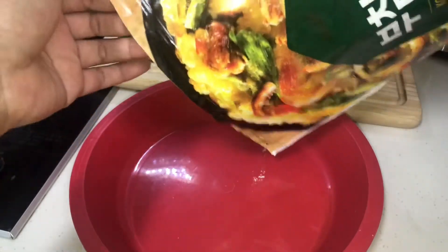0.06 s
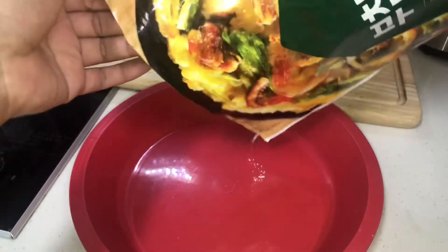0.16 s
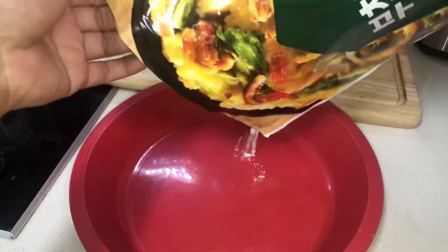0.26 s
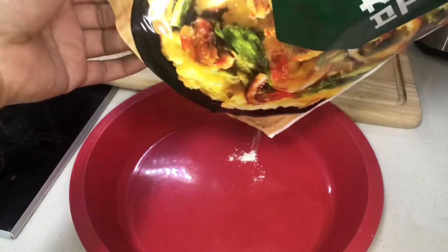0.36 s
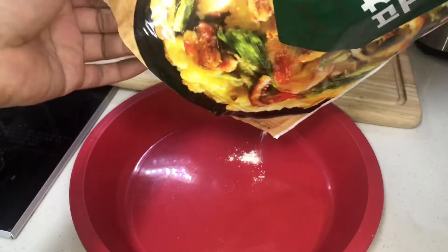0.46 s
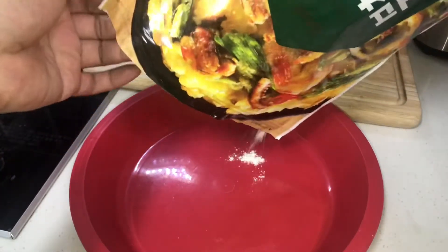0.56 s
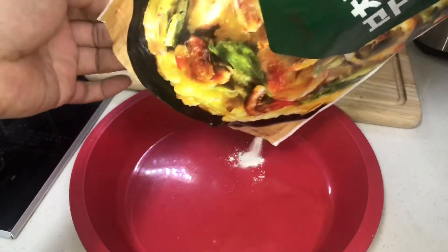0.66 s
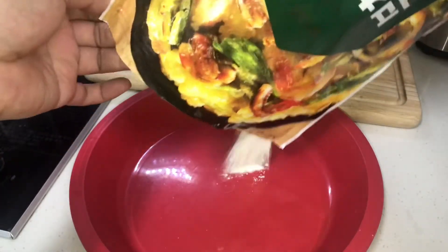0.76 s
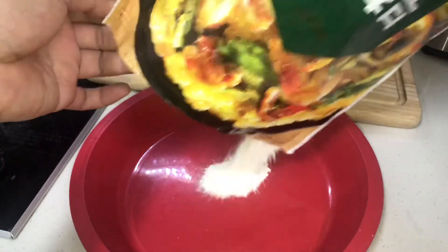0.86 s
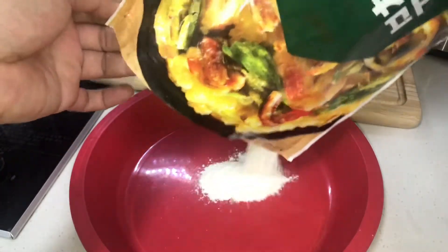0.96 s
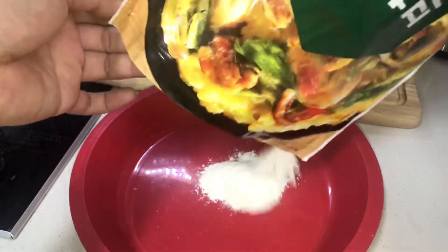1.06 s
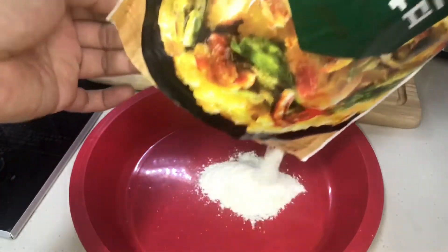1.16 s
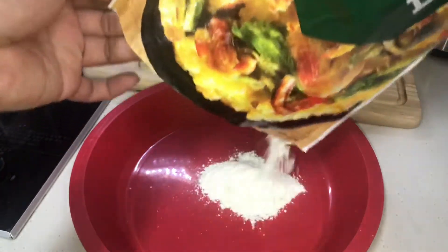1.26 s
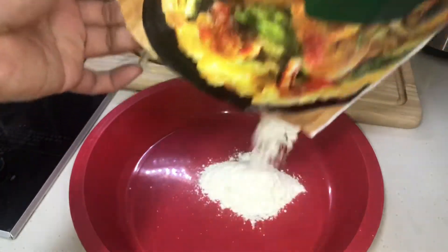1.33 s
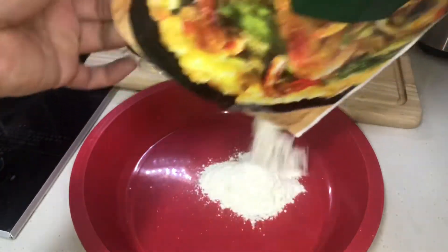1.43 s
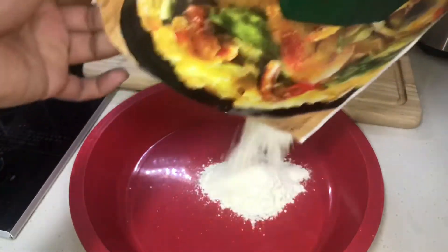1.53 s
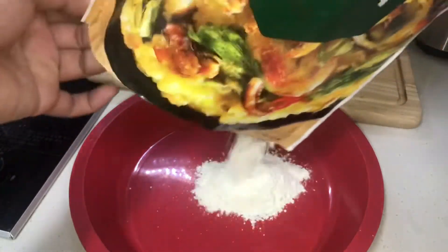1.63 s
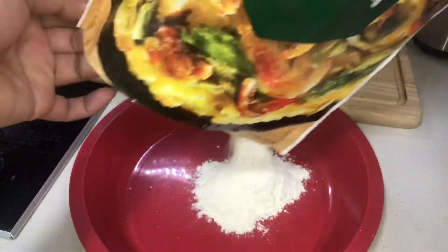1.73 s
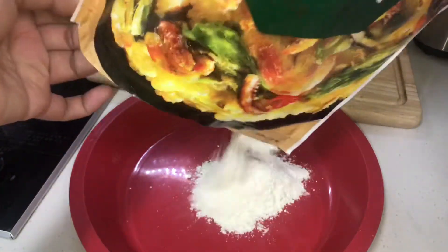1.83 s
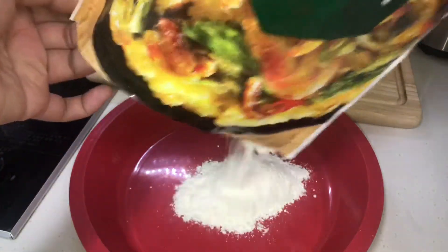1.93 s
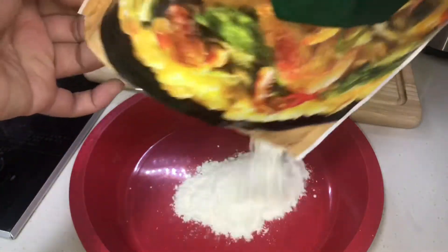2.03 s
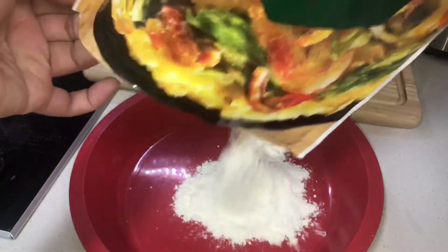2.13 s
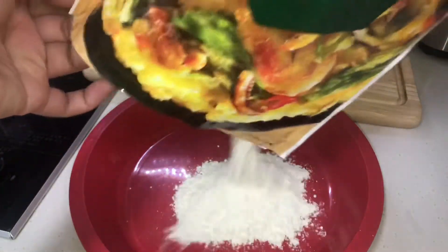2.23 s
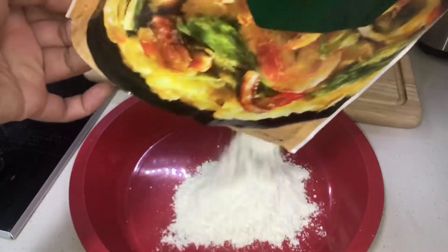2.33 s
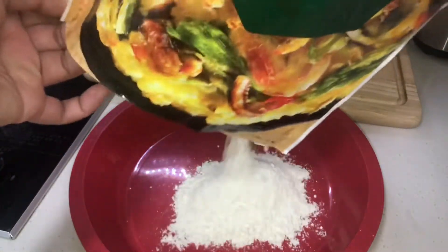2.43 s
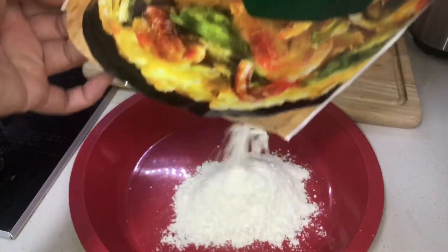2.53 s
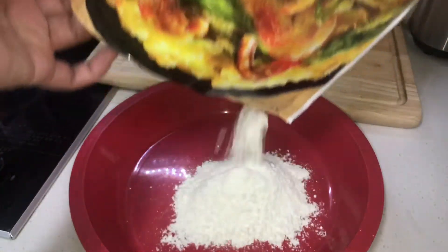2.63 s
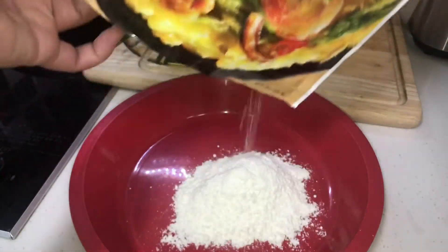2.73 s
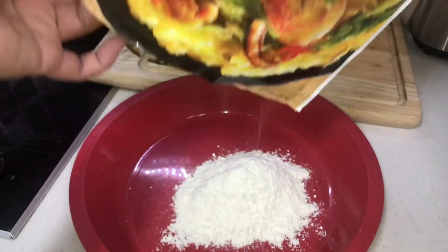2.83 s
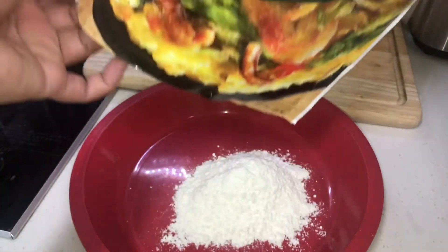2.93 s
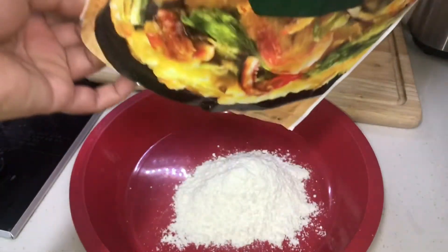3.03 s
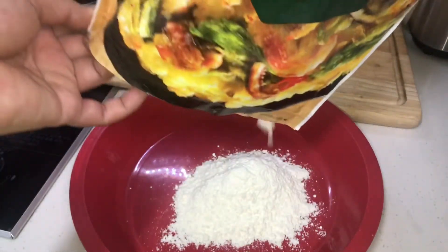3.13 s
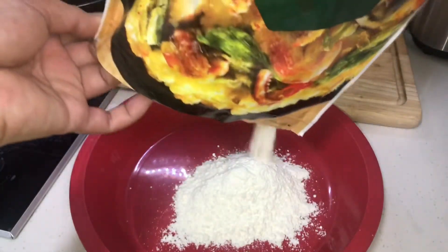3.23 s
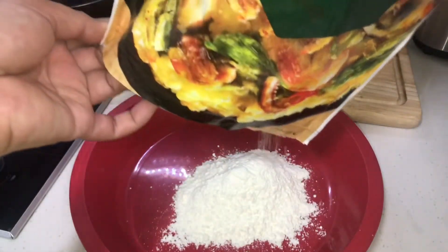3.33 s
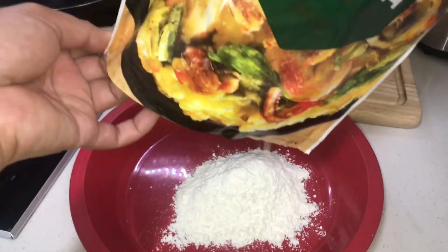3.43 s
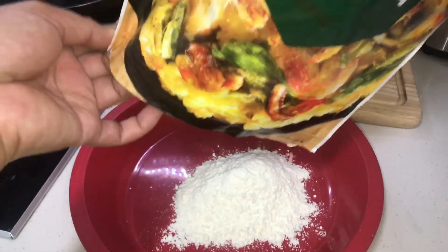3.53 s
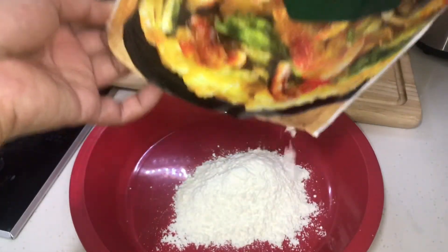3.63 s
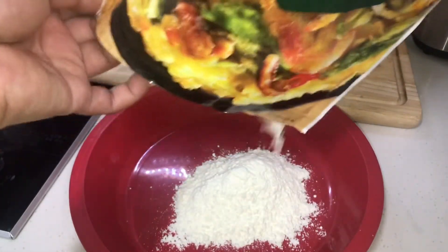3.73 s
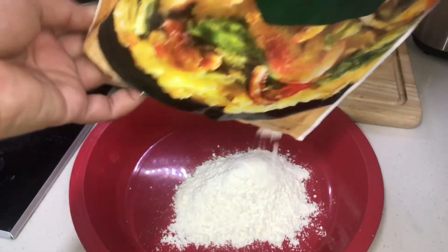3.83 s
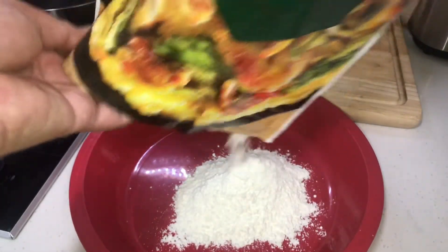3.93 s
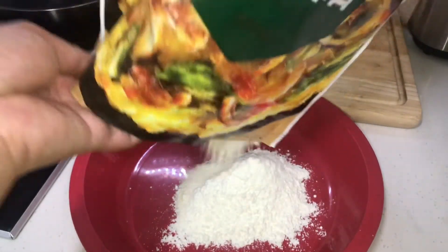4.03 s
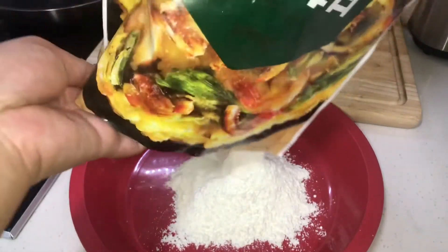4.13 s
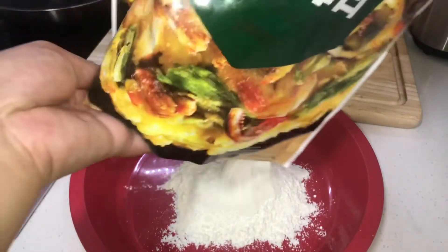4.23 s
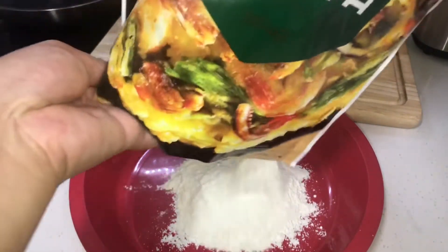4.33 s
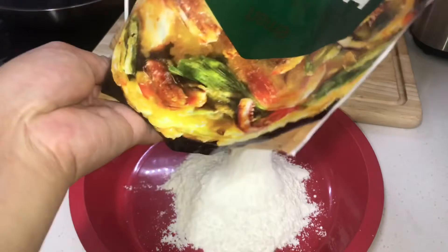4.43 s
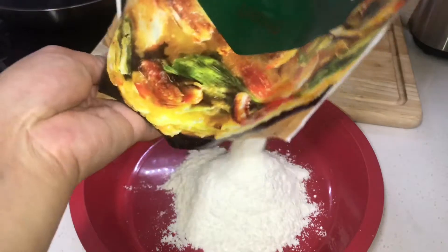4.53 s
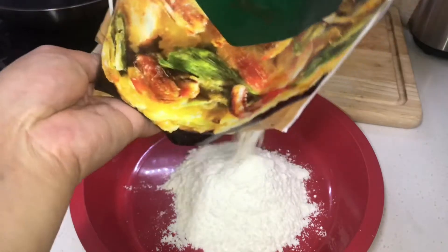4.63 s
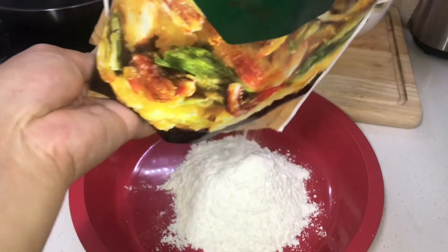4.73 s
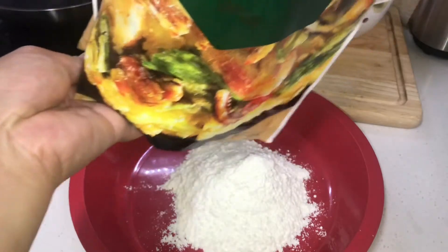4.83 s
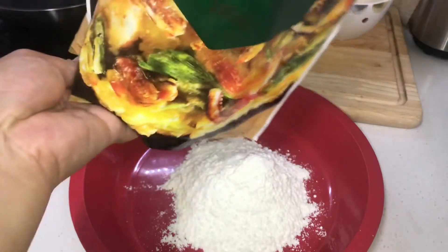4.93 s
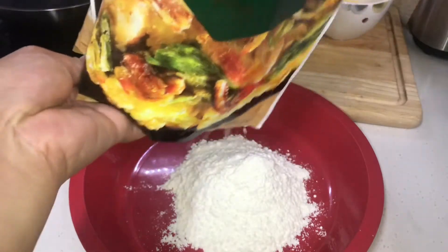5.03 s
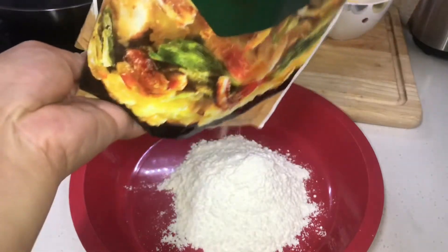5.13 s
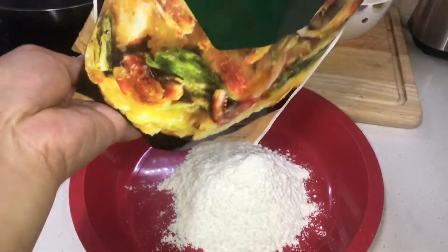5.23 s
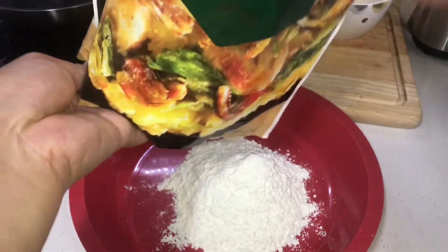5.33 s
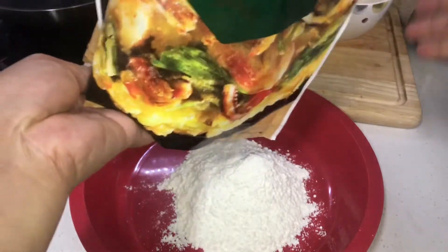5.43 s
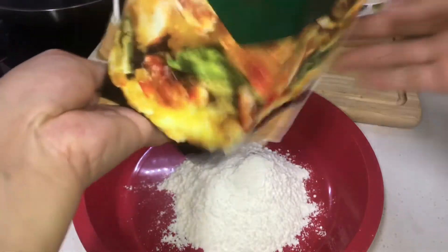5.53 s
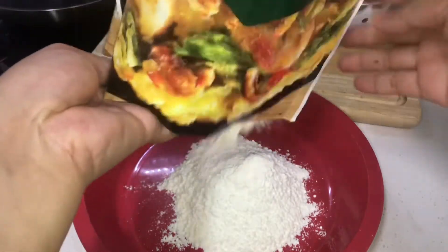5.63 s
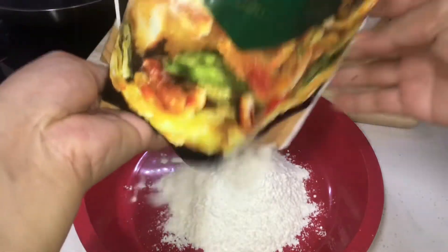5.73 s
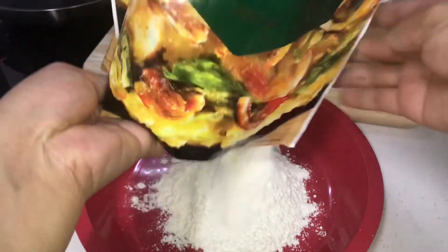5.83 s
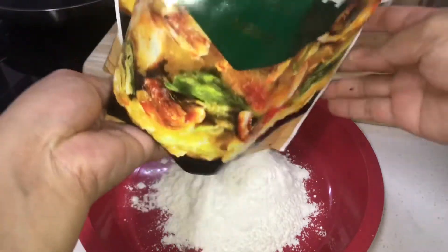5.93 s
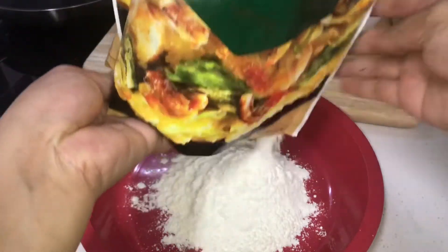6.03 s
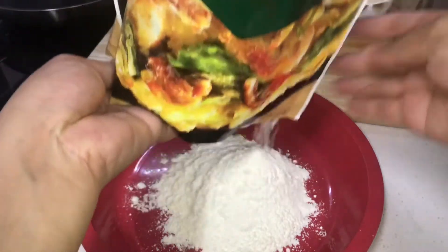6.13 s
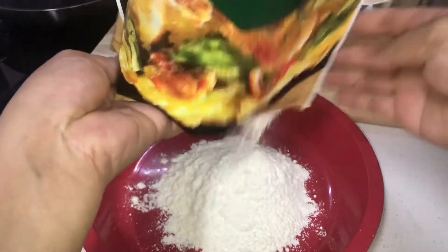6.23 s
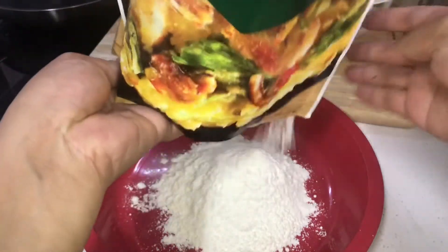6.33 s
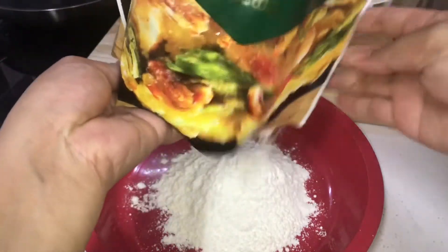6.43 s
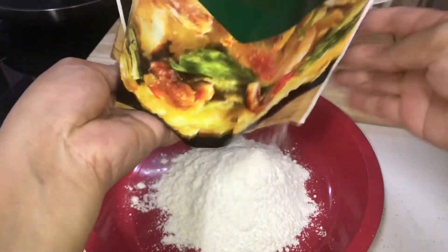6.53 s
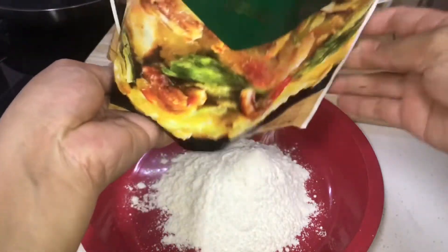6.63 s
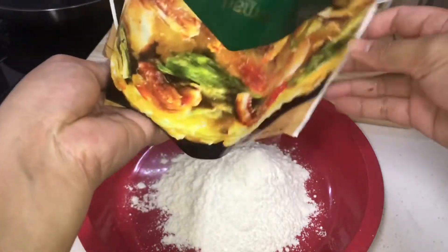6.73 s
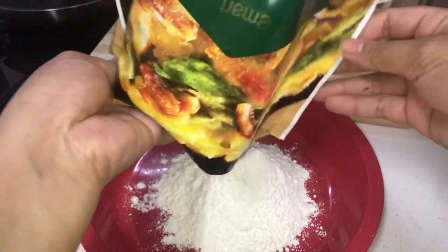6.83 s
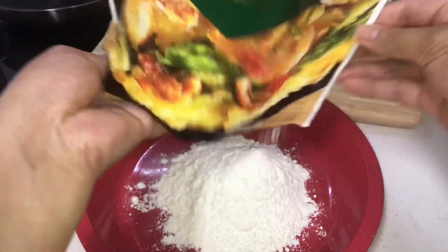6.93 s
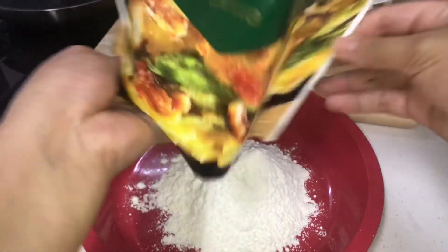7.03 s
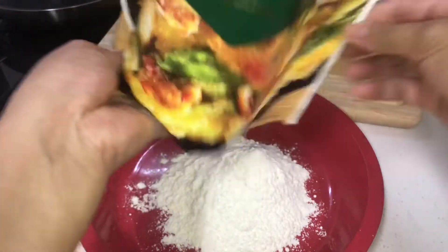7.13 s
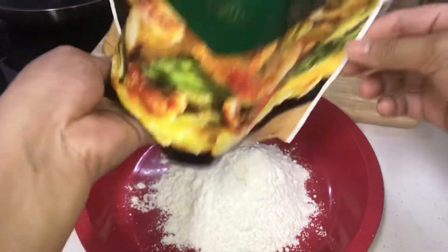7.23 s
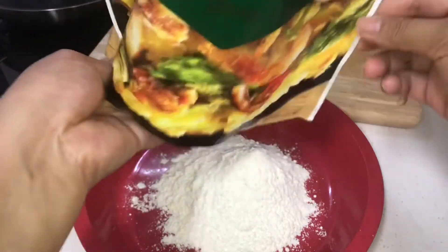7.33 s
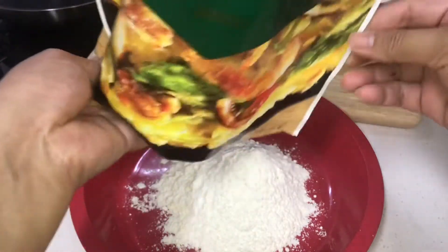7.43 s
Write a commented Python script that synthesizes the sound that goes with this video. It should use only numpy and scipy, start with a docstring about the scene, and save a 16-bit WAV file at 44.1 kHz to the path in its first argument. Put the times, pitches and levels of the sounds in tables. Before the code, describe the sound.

Soft rhythmic swishes of powder, about six per second, come from a tilted foil packet, with scattered clicks and low pats. After a lull near three seconds, sharp foil snaps and hissing slumps return. Later the packet is thumped harder and deeper, crumpling into a thick flurry of crackles. Near microphone, small hard room, plastic bowl underneath, quiet room noise and wavering mains hum.

```python
"""In a small kitchen a stiff foil packet of pancake mix is shaken and patted over a plastic bowl.
Creases of the foil snap as damped resonances, and many small ones crinkle while the foil is flexed.
Powder hisses as noise whose power follows its flow along the film; hands thump as low, damped noise bursts.
Modes of the bowl and echoes of the room follow, over quiet noise and two electric hums that beat slowly."""
import sys
import numpy as np
from scipy import signal
from scipy.fft import rfft, irfft
from scipy.io import wavfile
from scipy.ndimage import uniform_filter1d, map_coordinates

SR = 44100
rng = np.random.default_rng(int(sys.argv[2]) if len(sys.argv) > 2 else 0)


def transcribe(signal):
    """Save signal, clipped to [-1, 1], as a 16-bit WAV file at the path in sys.argv[1]."""
    frames = np.atleast_2d(signal).T
    limited = np.clip(frames, -1, 1)
    pcm = np.round(limited * 32767).astype(np.int16)
    wavfile.write(sys.argv[1], SR, pcm)


N = 329868
TIME = np.arange(N) / SR  # seconds

# Spectrum of the room noise. Each row: frequency in Hz, relative density in dB.
AIR_SPECTRUM = [(25, -12), (50, -6), (66, -5), (87, -25), (140, -19.5), (285, -17), (394, -23), (887, -23),
                (1560, -24.5), (5000, -38.5), (14800, -46)]
# Overtones of the mains hum. Each row: multiple of the mains frequency, rms level in dB.
HUM_OVERTONES = [(2, -71.5), (5, -73)]
# Modes of the bowl. Each row: frequency in Hz, level in dB, decay time t60 in seconds.
BOWL_MODES = [(386.5, -28, 0.071), (614, -26.5, 0.06), (1100, -30, 0.04), (2676, -35, 0.066)]
# Spectrum of the powder hiss. Each row: frequency in Hz, relative density in dB.
POWDER_SPECTRUM = [(150, -14), (400, 5.5), (1200, 6), (2500, 3.5), (4500, 1.5), (7000, 1.5), (10000, -0.5),
                   (13000, 0), (16000, -1.5)]
# Steady trickles from the tilted packet. Each row: start in seconds, end in seconds, relative level in dB.
POURS = [(0, 1.18, -60.5), (1.293, 2.46, -66.5), (2.845, 2.946, -65), (3.831, 4.45, -57.5),
         (5.555, 5.93, -59.5)]
# Single slides of powder along the film. Each row: middle in seconds, relative level in dB, length in seconds.
SLIDES = [(0.132, -53, 0.1), (4.567, -53, 0.12), (4.671, -56, 0.05), (5.289, -53, 0.015),
          (5.784, -50.5, 0.1), (6.009, -49.5, 0.014), (6.24, -50, 0.016), (6.74, -46.5, 0.035),
          (6.776, -43.5, 0.0036), (7.334, -41.5, 0.005)]
# Powder slides of the even shakes, in order. Each entry: relative level in dB.
SHAKE_SLIDE_DB = [-52.5, -52.5, -54, -60, -58.5, -55, -54.5, -55, -55, -54.5, -56.5]
# Powder slumping at once after a jolt. Each row: start in seconds, relative level in dB, t60 in seconds.
SLUMPS = [(3.447, -42.5, 0.4), (3.893, -34, 0.2), (5.001, -46.5, 0.24), (5.095, -44, 0.12),
          (5.267, -48, 0.092), (5.52, -36, 0.066), (6.155, -54.5, 1), (6.575, -35.5, 0.064),
          (7.343, -35, 0.035)]
# Pushes or pats of the hand on the filled packet.
# Each row: start in seconds, thud level in dB, thud pitch in Hz, relative crinkling level in dB.
PATS = [(0.145, -44.5, 332, -58), (0.244, -50, 330, -57), (1.383, -36, 164, -52.5),
        (1.628, -44.5, 270, -70), (2.123, -33.5, 230, -54), (3.454, -45.5, 269, -72),
        (4.027, -32, 258, -50), (4.269, -33.5, 157, -60), (5.002, -39.5, 184, -57),
        (5.093, -43.5, 186, -55.5), (5.521, -36, 135, -34), (5.725, -38.5, 149, -43.5),
        (5.924, -53, 185, -49.5), (6.151, -30.5, 119, -41.5), (6.37, -30, 88, -43),
        (6.543, -32.5, 88.5, -50.5), (6.58, -34, 195, -51), (6.768, -41, 91.5, -48), (7.073, -37, 125, -63)]
# Squeezes: a tighter grip keeps the foil crinkling.
# Each row: start in seconds, end in seconds, relative crinkling level in dB.
SQUEEZES = [(2.012, 2.226, -55), (3.908, 4.405, -63), (6.797, 7.17, -49)]
# Radiation of the foil. Each row: frequency in Hz, relative gain in dB.
FOIL_SPECTRUM = [(200, -2.5), (390, -5), (700, -4), (1010, -1), (1400, 1.5), (2000, -3.5), (2710, -2),
                 (3800, -4), (6300, -5), (8600, -10.5)]
# Large creases snapping.
# Each row: start in seconds, level in dB, pitch of the flipping facet in Hz, ring of the panel around it in Hz.
SNAPS = [(0.1736, -43, 2900, 1180), (0.3933, -34, 1750, 1080), (0.647, -36.5, 1500, 1150),
         (0.687, -33.5, 1330, 1100), (0.7956, -16.5, 6050, 2470), (0.931, -48, 950, 500),
         (0.9592, -41.5, 1370, 1220), (1.1488, -45.5, 1300, 1000), (1.2912, -45, 1250, 1040),
         (1.3415, -34.5, 1580, 880), (1.391, -38.5, 2320, 1190), (1.546, -44, 1400, 1330),
         (1.644, -43, 1300, 1590), (1.7251, -34.5, 3330, 1520), (1.729, -38, 3340, 630),
         (2.024, -49, 1600, 1500), (2.043, -48.5, 1700, 1280), (2.107, -45, 1000, 1000),
         (2.124, -29, 2280, 1100), (2.183, -42, 1500, 1350), (2.218, -49, 1400, 960),
         (2.2788, -45.5, 1100, 1040), (3.5774, -38, 2180, 2290), (3.8958, -18.5, 10000, 2690),
         (4.0304, -30.5, 3200, 1030), (4.105, -30.5, 2700, 1020), (4.134, -43, 1300, 1100),
         (4.2696, -19.5, 5270, 1570), (4.367, -32.5, 1660, 560), (4.5185, -45.5, 1420, 1310),
         (5.003, -38, 5800, 1290), (5.096, -37, 3230, 1270), (5.473, -41, 990, 1230),
         (5.5243, -38, 2330, 1350), (5.5347, -29.5, 1650, 1400), (5.548, -32, 1600, 3020),
         (5.56, -32, 2360, 970), (5.573, -37, 800, 616), (5.581, -27, 1650, 2550), (5.589, -36, 1300, 536),
         (5.609, -39, 1700, 1100), (5.624, -36, 1350, 1190), (5.75, -38.5, 1190, 960),
         (5.8032, -41.5, 2380, 1830), (6.1665, -25, 4100, 2860), (6.244, -40, 2240, 1200),
         (6.3814, -40, 1350, 2020), (6.4045, -32.5, 1420, 1310), (6.4515, -41, 1500, 634),
         (6.476, -43, 1300, 1580), (6.54, -46, 3400, 2980), (6.551, -42, 1200, 1300),
         (6.578, -33.5, 1700, 680), (6.8087, -29.5, 5500, 985), (6.8244, -34, 2960, 1020),
         (6.8527, -27.5, 2700, 1530), (6.9264, -32, 2280, 3060), (6.943, -40, 1800, 1000),
         (6.9596, -28.5, 1910, 1320), (7.0093, -35, 1400, 970), (7.0171, -31, 3600, 1400),
         (7.0541, -30, 2680, 3070), (7.061, -34, 1500, 940), (7.068, -25, 2070, 815),
         (7.08, -22.5, 3460, 1360), (7.109, -40.5, 1300, 594), (7.1473, -28, 1730, 1190),
         (7.154, -40.5, 1900, 1120), (7.165, -43, 1900, 790), (7.1754, -33.5, 2230, 790),
         (7.187, -36.5, 1750, 1560), (7.344, -39.5, 8800, 3200)]

# Two hums: the motor lags the mains by SLIP_HZ, and they add up fully at IN_STEP_S (rms levels).
MAINS_HZ, MAINS_DB = 59.99, -56.5
MOTOR_DB, SLIP_HZ, IN_STEP_S = -51, 0.512, 1.8
# Even shakes: each slides the powder and, as it turns back, flexes the foil.
FIRST_SHAKE_S, SHAKE_PERIOD_S, SHAKE_SLIDE_S = 0.69, 0.1567, 0.09
SHAKE_FLEX_DB, SHAKE_FLEX_LEAD_S = -68, 0.078
# After a pat the foil flexes first, then powder spills over the lip (level relative to the thud).
FLEX_PEAK_S, SPILL_PEAK_S, SPILL_DB = 0.023, 0.037, -31
POUR_ATTACK_S, POUR_T60 = 0.0013, 0.82
SQUEEZE_ATTACK_S, SQUEEZE_T60 = 0.0063, 0.42
CRINKLES_PER_S = 190
TOP_HZ = 16100


def undb(db):
    """Logarithmic level: decibels to amplitude gain."""
    return 10 ** (np.asarray(db) / 20)


def unit(x):
    """Normalization: scale a signal to energy 1."""
    return x / np.sqrt(np.sum(x ** 2))


def fade(t, t60):
    """Exponential decay, by 60 dB in t60 seconds."""
    return np.exp(-np.log(1000) * t / t60)


def freqs(n):
    """Discrete spectrum: frequencies of its n-point bins in Hz, kept above zero."""
    return np.maximum(np.arange(n // 2 + 1) * SR / n, 1)


def colour(points, hz):
    """Spectral envelope: gain interpolated in dB over log frequency."""
    f, db = np.transpose(points)
    return undb(np.interp(np.log(hz), np.log(f), db))


def shape(x, gain):
    """Minimum-phase filtering: the folded cepstrum gives a causal filter of the given gain."""
    n = len(x)
    cepstrum = irfft(np.log(gain), n)
    cepstrum[1:n // 2] *= 2
    cepstrum[n // 2 + 1:] = 0
    return irfft(rfft(x) * np.exp(rfft(cepstrum)), n)


def tint(x, points):
    """Spectral weighting of a full-length signal, normalized to rms 1."""
    return unit(irfft(rfft(x) * colour(points, freqs(N)), N)) * np.sqrt(N)


def walk(rate):
    """Slow random fluctuation: normal values, `rate` per second, joined by straight lines."""
    knots = rng.standard_normal(int(N / SR * rate) + 2)
    return np.interp(TIME * rate, np.arange(len(knots)), knots)


def burst(t, t60, order):
    """Whitened decaying noise: its power, smoothed over `order` bins, is evened out."""
    spectrum = rfft(rng.standard_normal(len(t)) * fade(t, t60))
    power = uniform_filter1d(np.abs(spectrum) ** 2, order)
    return unit(shape(irfft(spectrum), power ** -.5))


def add(out, s, x, db):
    """Superposition: mix in a hit at s seconds; its level is its energy spread over 10 ms."""
    i = max(int(s * SR), 0)
    x = unit(x) * undb(db) * np.sqrt(SR / 100)
    out[i:i + len(x)] += x[:len(out) - i]


def swell(s, peak_s):
    """Critically damped response to a push at s: it rises to 1 after peak_s and relaxes."""
    age = np.maximum(TIME - s, 0) / peak_s
    return age * np.exp(1 - age)


def held(start, end, attack_s, t60):
    """Exponential relaxation: attack towards 1, hold, then decay."""
    attack = 1 - np.exp(-np.maximum(TIME - start, 0) / attack_s)
    return attack * fade(np.maximum(TIME - end, 0), t60)


def shakes():
    """Periodic motion: times of the even shakes in seconds."""
    return FIRST_SHAKE_S + SHAKE_PERIOD_S * np.arange(len(SHAKE_SLIDE_DB))


def background(air_db=-56.93, waver_db=1.08):
    """Beats: a motor just under the mains frequency drifts in and out of phase, over soft room noise."""
    t = TIME - IN_STEP_S
    phase = 2 * np.pi * MAINS_HZ * t
    hum = undb(MAINS_DB) * np.sin(phase)
    hum += sum(undb(db) * np.sin(round(multiple) * phase) for multiple, db in HUM_OVERTONES)
    hum += undb(MOTOR_DB) * np.sin(2 * np.pi * (MAINS_HZ - SLIP_HZ) * t)
    air = tint(rng.standard_normal(N), AIR_SPECTRUM) * undb(air_db + waver_db * walk(5.15))
    return np.sqrt(2) * hum + air  # sine peaks are sqrt(2) times their rms


def kitchen(x, near_db=-10, near_t60=0.051, room_db=-17, room_t60=0.31, dull_hz=5000, size=16384):
    """Reverberation: bowl and worktop reflect early, the walls later; the echoes change as packet and hands move."""
    t, hz = TIME[:size], freqs(size)
    walls = 1 / np.hypot(1, hz / dull_hz) / np.hypot(1, 150 / hz)
    out, step = x.copy(), size // 4
    for start in range(0, N, step):  # new echoes for each stretch of sound
        near = unit(rng.standard_normal(size) * fade(t, near_t60) * (t > .002))
        far = unit(rng.standard_normal(size) * fade(t, room_t60) * (t > .009))
        response = shape(undb(near_db) * near + undb(room_db) * far, walls)
        echoes = signal.fftconvolve(x[start:start + step], response)
        out[start:start + len(echoes)] += echoes[:N - start]
    return out


def bowl(x, size=8192):
    """Sympathetic resonance: the bowl's fixed modes are set ringing through the air."""
    t = TIME[:size]
    ring = sum(undb(db) * unit(np.cos(2 * np.pi * hz * t) * fade(t, t60)) for hz, db, t60 in BOWL_MODES)
    return x + signal.fftconvolve(x, ring)[:N]


def mirrored(x, lag_s=0.0003886, share=0.2, sway=0.028):
    """Comb filtering: the bowl mirrors the hiss, and the gap between them sways."""
    late = TIME - lag_s * (1 + sway * walk(7.3))
    return x - share * map_coordinates(x, [late * SR], order=3, mode="mirror")


def powder_flow():
    """Addition of incoherent powers: pours, spills, slides and slumps each add their flow."""
    power = sum((undb(db) * held(start, end, POUR_ATTACK_S, POUR_T60)) ** 2 for start, end, db in POURS)
    power += sum((undb(db + SPILL_DB) * swell(s, SPILL_PEAK_S)) ** 2 for s, db, _, _ in PATS)
    shake_slides = [(s, db, SHAKE_SLIDE_S) for s, db in zip(shakes(), SHAKE_SLIDE_DB)]
    for s, db, length in list(SLIDES) + shake_slides:
        power += undb(db) ** 2 * np.exp(-2 * np.abs(2 * (TIME - s) / length) ** 3)
    for s, db, t60 in SLUMPS:
        age = np.maximum(TIME - s, 0)
        power += (undb(db) * fade(age, t60) * (1 - np.exp(-age / 0.0015))) ** 2
    return power


def powder(grain_db=4, clump_db=2.0, surge_db=1.3, gain_db=-1.12):
    """Friction noise: countless fine grains of uneven strength rub the film and flow in clumps."""
    grains = rng.standard_normal(N) * undb(grain_db * rng.standard_normal(N))
    hiss = mirrored(tint(grains, POWDER_SPECTRUM))
    clumps = np.clip(walk(260), 0, 2) ** 2  # now and then a lump scrapes past
    unevenness = undb(gain_db + clump_db * clumps + surge_db * walk(23))
    return hiss * np.sqrt(powder_flow()) * unevenness


def pats(t60=0.054, rise_s=0.0048, width=0.5, size=16384):
    """Heavily damped resonance: a soft push on the heavy packet gives a dull thud."""
    out, t = np.zeros(N), TIME[:size]
    for s, db, hz, _ in PATS:
        ratio = freqs(size) / hz
        body = 1 / np.hypot(width, ratio - 1 / ratio) / np.hypot(2, ratio)
        push = burst(t, t60, order=30) * (1 - np.exp(-t / rise_s))
        add(out, s, shape(push, body), db)
    return out


def flexing():
    """Forced bending: pats, shakes and squeezes add in power, returned as a gain."""
    power = sum((undb(db) * swell(s, FLEX_PEAK_S)) ** 2 for s, _, _, db in PATS)
    for s in shakes():
        power += (undb(SHAKE_FLEX_DB) * swell(s - SHAKE_FLEX_LEAD_S, FLEX_PEAK_S)) ** 2
    for start, end, db in SQUEEZES:
        power += (undb(db) * held(start, end, SQUEEZE_ATTACK_S, SQUEEZE_T60)) ** 2
    return np.sqrt(power)


def crease(facet_hz, ring_hz, body_db, size=3072, flurry_t60=0.016, body_t60=0.048, body_hz=650,
           lag_s=0.00391, panel_hz=550, damping=1.0, reach=2.4, ring_db=9, ring_q=6.3,
           settle_db=-11, settle_t60=0.059):
    """Buckling: a facet flips and passes little above its pitch; the panel around it adds body and rings."""
    t, hz = TIME[:size], freqs(size)
    ratio = hz / facet_hz
    facet = 1 / np.sqrt((1 - ratio ** 2) ** 2 + damping * ratio ** 2) / np.hypot(1, (ratio / reach) ** 2)
    panel = undb(body_db / (1 + (hz / panel_hz) ** 4))
    detuning = ring_q * (hz / ring_hz - ring_hz / hz)
    ring = np.sqrt(1 + (undb(ring_db) ** 2 - 1) / (1 + detuning ** 2))
    # long bending waves arrive last and linger; short ones die soon
    dispersion = np.exp(-2j * np.pi * lag_s * body_hz * np.arctan(hz / body_hz))
    slow = 1 / (1 + (hz / body_hz) ** 4)  # share of power in the long waves
    flurry = np.sqrt(1 - slow) * rfft(burst(t, flurry_t60, order=60))
    flurry += np.sqrt(slow) * rfft(burst(t, body_t60, order=16))
    # neighbouring wrinkles settle in a scatter of weaker clicks
    wrinkles = rng.standard_normal(size) ** 3
    flips = (t == 0) + undb(settle_db) * unit(wrinkles * fade(t, settle_t60))
    waves = irfft(flurry * rfft(flips) * dispersion)
    return shape(waves, colour(FOIL_SPECTRUM, hz) * facet * panel * ring)


def crinkles(facet_hz, body_db, gain_db, scatter_db=5.0, octaves=1.0, count=120):
    """Random pulse train: small creases of all sizes give way at chance times, at a steady mean rate."""
    pitches = facet_hz * 2 ** (octaves * (2 * rng.random((count, 2)) - 1))
    creases = [crease(own_hz, ring_hz, body_db) for own_hz, ring_hz in pitches]
    out = np.zeros(N)
    for when, chance, which in rng.random((int(CRINKLES_PER_S * N / SR), 3)):
        db = -scatter_db * np.log(chance + 0.13)  # few strong, many weak
        add(out, when * N / SR, creases[int(which * count)], db)
    return unit(out) * np.sqrt(N) * undb(gain_db)


def snaps(crisp_db=-27, softening=0.58):
    """Snap-through instability: large creases flip; the gentler the snap, the more body it has."""
    out = np.zeros(N)
    for s, db, facet_hz, ring_hz in SNAPS:
        body_db = softening * (crisp_db - db)
        add(out, s, crease(facet_hz, ring_hz, body_db), db)
    return out


def scene():
    """Superposition of the packet over the bowl, its echoes and the background, in one channel."""
    muffled = crinkles(facet_hz=1300, body_db=12.0, gain_db=2.0)  # foil with powder behind it
    bright = crinkles(facet_hz=3520, body_db=6.0, gain_db=-10.0)  # fine bright crackle of tiny ticks
    packet = snaps() + (muffled + bright) * flexing() + pats()
    source = bowl(packet) + powder()
    return (kitchen(source) + background())[None]


def record(dry):
    """Band limiting: a high-pass at 33 Hz cuts the deepest rumble, a steep low-pass the top."""
    dry = signal.sosfilt(signal.butter(6, 33, "high", fs=SR, output="sos"), dry)
    return signal.sosfilt(signal.ellip(10, .2, 70, TOP_HZ, fs=SR, output="sos"), dry)


dry = scene()
out = record(dry)
transcribe(out)
```